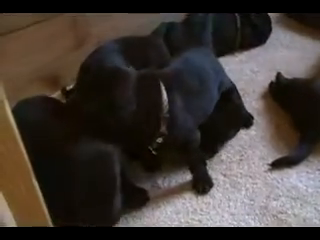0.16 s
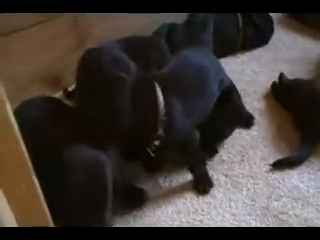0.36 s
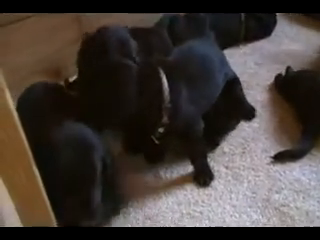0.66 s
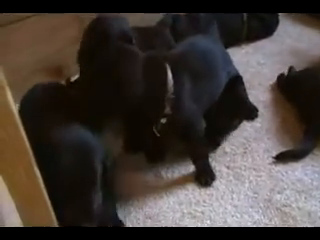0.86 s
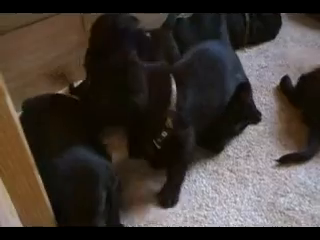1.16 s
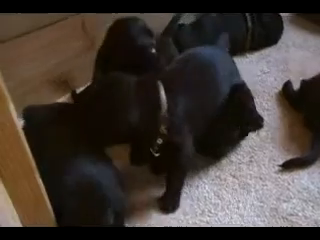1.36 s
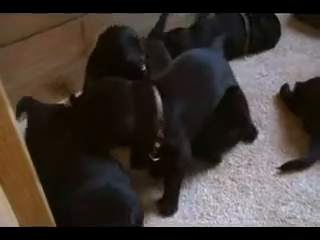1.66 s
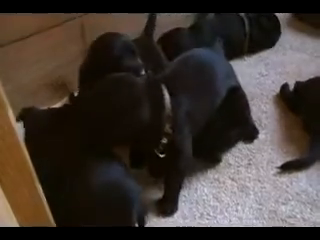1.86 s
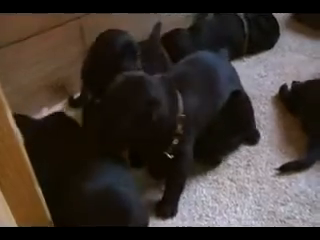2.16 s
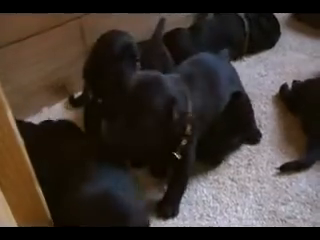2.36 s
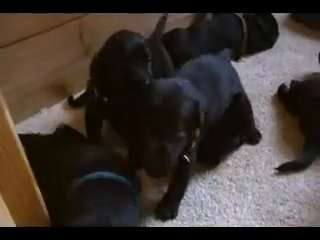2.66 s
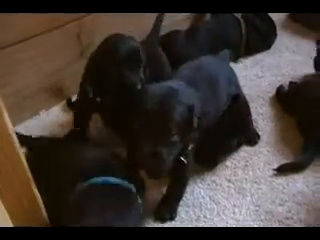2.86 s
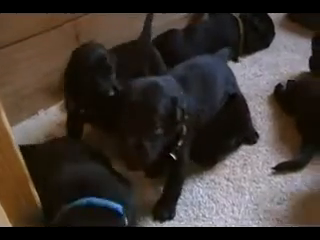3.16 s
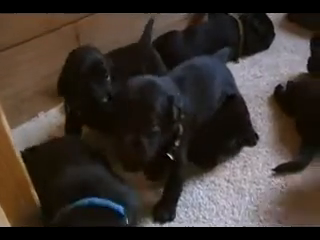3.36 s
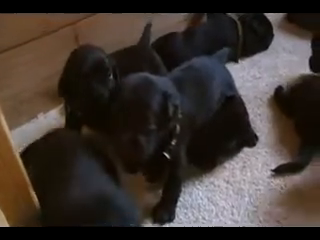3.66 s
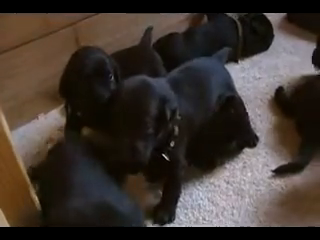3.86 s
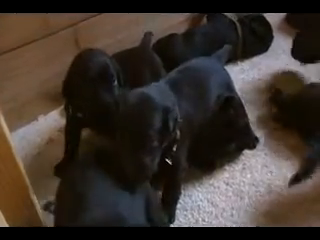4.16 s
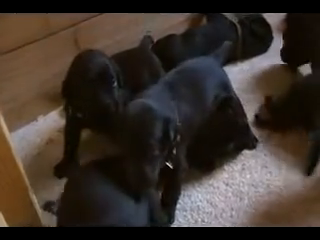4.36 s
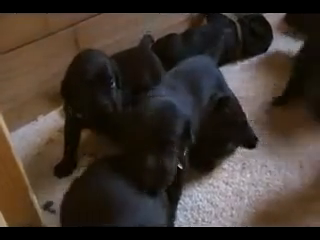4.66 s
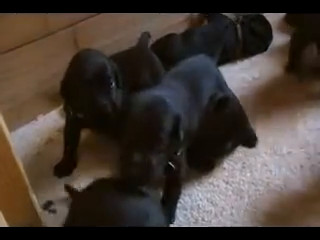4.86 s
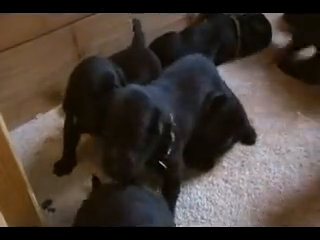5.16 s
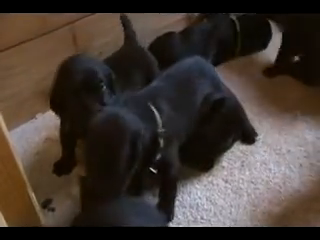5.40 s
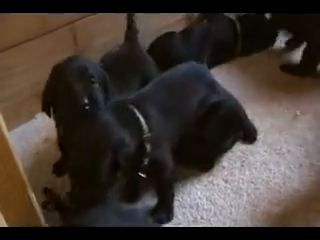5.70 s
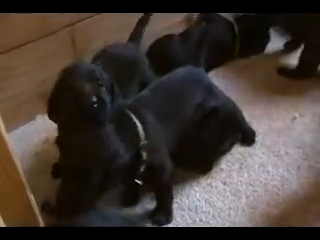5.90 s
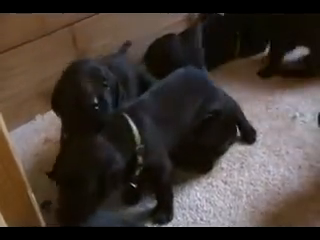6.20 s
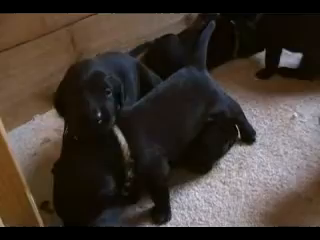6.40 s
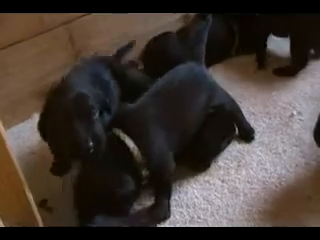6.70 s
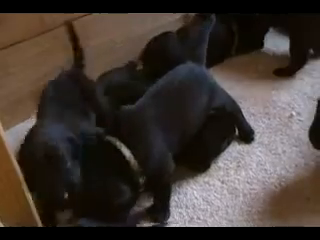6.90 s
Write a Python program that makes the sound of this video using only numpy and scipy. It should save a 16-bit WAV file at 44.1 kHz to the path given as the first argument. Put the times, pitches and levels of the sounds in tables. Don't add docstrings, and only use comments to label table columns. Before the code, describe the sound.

A young puppy cries close to the microphone in a small carpeted wooden pen, over steady faint hiss and a low house rumble. A soft floor thump and a tiny whine open the scene; at 0.5 s comes a bright, wavering open-mouthed yelp, and near 0.9 s a sharp shriek cracks into a hoarse low screech. From 1.25 to 3.5 s quick nasal whines, thin upward squeaks and raspy breaks follow in little clusters, with small gaps. An arching whine at 3.7 s leads to a squeak and groan around 4 s, a fuller thump near 4.4 s, a short howl at 4.6 s and a moan at 4.95 s. After a climbing cry at 5.3 s and a stutter at 5.55 s, the voice tires into brief low grunts until 7 s. Claws and collar tags tick lightly, paws thump hollow boards, and fur briefly scuffs carpet throughout.

```python
import sys
import numpy as np
from scipy import signal
from scipy.io import wavfile
from scipy.ndimage import uniform_filter1d

SR = 44100
rng = np.random.default_rng(int(sys.argv[2]) if len(sys.argv) > 2 else 0)


def dump_mix(stems):
    frames = np.atleast_2d(stems).T
    limited = np.clip(frames, -1, 1)
    pcm = np.round(limited * 32767).astype(np.int16)
    wavfile.write(sys.argv[1], SR, pcm)


def voltage_ratio(decibels):
    exponent = np.asarray(decibels, float) / 20
    return 10 ** exponent


N = 310464

# (frequency [Hz], density [dB per Hz])
HISS_SPECTRUM = [(35, -30), (60, 1.5), (354, -12), (732, -17), (1060, -21.5), (1440, -21), (9130, -28),
                 (13900, -38.5), (16000, -81)]
# (frequency [Hz], share [0-1])
HISS_LIKENESS = [(60, 0.73), (600, 0.56), (4000, 0.096), (12000, 0.75)]
# (time [s], level [dB])
RUMBLE_LEVEL = [(0, -39.5), (1.2, -38.5), (3.6, -39.5), (4.2, -43.5), (5.8, -42.5), (6.2, -49), (7.04, -45)]
# (time [s], peak [dB], frequency [Hz])
FLOOR_THUMPS = [(0.02, -28, 98.4), (0.804, -40, 110), (1.465, -32.5, 102), (2.19, -29, 100),
                (3.383, -36, 165), (3.447, -30, 129), (4.359, -21.5, 106), (4.525, -34.5, 99),
                (4.612, -35, 104), (5.133, -37, 95), (5.197, -33, 145), (5.455, -25.5, 101),
                (5.528, -31.5, 69.6), (6.404, -34, 94.2), (6.986, -26.5, 103)]
# (time [s], peak [dB], frequency [Hz])
CLAW_TICKS = [(0.324, -36.5, 9900), (0.417, -43.5, 3450), (0.4713, -45, 2620), (0.7281, -36, 1490),
              (2.826, -40, 9850), (3.337, -37, 1900), (3.8947, -41.5, 2520), (4.439, -44, 3270),
              (5.156, -31, 7500), (5.43, -42, 2180), (6.1858, -40.5, 1700), (6.4447, -33.5, 6250),
              (6.56, -41.5, 2330), (6.767, -33.5, 8100), (6.8527, -36.5, 1540)]
# (time [s], level [dB], length [s])
CARPET_SCUFFS = [(0.191, -36, 0.035), (1.162, -44, 0.088), (2.382, -45, 0.11), (3.573, -38.5, 0.015),
                 (5.138, -38.5, 0.055)]

# (frequency [Hz], width [Hz], level [dB])
NOSE_MODES = [(731.4, 324, 18.5), (964, 107, 12)]
MOUTH_MODES = [(1540, 520, 0)]
UPPER_MODES = [(4350, 1400, 8.5), (5100, 1440, 14)]
AIR_MODES = [(8620, 3300, -5), (14700, 1200, -18)]

# (start [s], length [s], effort [dB], first pitch [Hz], last pitch [Hz])
WHINES = [(0.25, 0.04, -23, 534, 708), (1.315, 0.043, -18.5, 672, 802), (1.693, 0.025, -21, 632, 718),
          (2, 0.034, -21.5, 570, 662), (2.267, 0.047, -14.5, 665, 805), (2.598, 0.037, -19, 569, 746),
          (3.207, 0.02, -16.5, 691, 808), (4.372, 0.012, -17.5, 736, 723), (5.777, 0.031, -25.5, 661, 682),
          (5.799, .03, -17, 722, 682)]
# (start [s], length [s], effort [dB], first pitch [Hz], last pitch [Hz])
SQUEAKS = [(1.541, 0.035, -29, 809, 1146), (1.897, 0.051, -28.5, 955, 1213), (2.533, 0.054, -33, 823, 1162),
           (2.841, 0.051, -38.5, 820, 1104), (3.985, .062, -24.5, 772, 1146), (4.297, .066, -47, 914, 1175),
           (5.243, 0.025, -23.5, 677, 942)]
# (start [s], length [s], effort [dB], pitch [Hz], chest tone re effort [dB])
GRUNTS = [(5.824, 0.021, -20, 245, -14), (6.055, 0.038, -25, 317, -13.5), (6.085, 0.017, -24, 248.6, -9.5),
          (6.297, .02, -24.5, 290.7, -10.5), (6.314, .044, -21, 262.8, -13.5),
          (6.573, .018, -28, 272.4, -7), (6.591, 0.026, -25.5, 230, -14), (6.863, 0.048, -26, 242.4, -13)]
# (start [s], length [s], effort [dB], pitch [Hz], chest tone re effort [dB])
OPEN_BURSTS = [(3.003, .018, -28, 334.4, -37), (3.281, .026, -29.5, 346.5, -5.5),
               (6.372, .02, -34, 261.6, 2), (6.648, 0.033, -34, 231, -0.5)]
# (start [s], length [s], effort [dB], mouth resonance re effort [dB])
RASPS = [(1.297, .019, -23, -3.5), (1.569, 0.031, -25, -1), (1.599, 0.035, -20.5, -3.5),
         (1.644, 0.06, -21.5, -2.5), (1.94, 0.069, -22, -1), (2.222, .05, -21, -4.5),
         (2.577, .024, -22.5, -7), (2.894, 0.016, -23.5, -9), (3.426, .016, -34, -13),
         (3.46, 0.037, -21.5, -11), (4.019, 0.025, -25, -6), (5.267, 0.035, -22, -8)]

# (time [s], effort [dB], pitch [Hz], jaw opening [dB])
YELP = [(0.505, -18, 1023, -20), (0.529, -28.5, 1233, -5.5), (0.535, -23, 1175, 10.5),
        (0.577, -13.5, 1288, -3), (0.591, -18.5, 1207, 0.5), (0.615, -16.5, 1247, -12.5),
        (0.637, -25, 1108, 7), (0.665, -26, 1137, 2.5), (0.679, -36.5, 1075, 10.5)]
SHRIEK = [(0.857, -21, 1050, -21), (0.865, -30, 1167, -8.5), (0.903, -13, 1408, -27.5),
          (0.913, -29.5, 1320, -3)]
SCREECH = [(0.919, -27, 326.6, 12), (0.93, -32, 298, 11), (0.945, -32, 322, 13), (0.97, -26.5, 294.2, 5.5),
           (1.005, -29, 320, 3.5), (1.024, -25.5, 331, -4), (1.04, -44, 362, -1)]
CHIRP = [(1.258, -50, 1087, -10), (1.269, -39, 1200, -12), (1.285, -25.5, 1257, -18),
         (1.299, -22, 1282, -13.5)]
# (time [s], effort [dB], pitch [Hz], mouth resonance re effort [dB])
HOWL = [(4.59, -33, 371, -20), (4.601, -21, 407.3, -5.5), (4.652, -16, 436, -10), (4.67, -26, 460.7, 8.5),
        (4.7, -19, 442, -6.5), (4.714, -18, 436, -8), (4.739, -37, 435, -6)]
# (time [s], effort [dB], pitch [Hz])
ARCH = [(3.7, -36, 662), (3.716, -19, 776), (3.741, -25.5, 901), (3.757, -14.5, 720), (3.766, -65, 710)]
GROAN = [(4.047, -13.5, 346.4), (4.065, -21.5, 323.5), (4.081, -19.5, 293.6), (4.101, -21, 309),
         (4.112, -23, 365)]
MOAN = [(4.944, -27, 363), (4.956, -17.5, 402), (4.97, -17, 346.7), (4.994, -17.5, 408.6),
        (5.011, -19.5, 465), (5.024, -44, 462)]
CLIMB = [(5.29, -24.5, 403), (5.304, -26.5, 481), (5.32, -32, 596), (5.33, -35, 672)]
STUTTER = [(5.535, -47, 793), (5.553, -16, 728), (5.566, -34, 771), (5.573, -19, 822), (5.582, -37, 909),
           (5.598, -14.5, 680), (5.607, -69, 650)]

SQUEAK_SHAPE = dict(attack_s=0.0038, release_s=0.005, first_db=-9, last_db=-7, swell_db=-3.5, bend=2.5)
WHINE_SHAPE = dict(attack_s=0.0096, release_s=0.0058, first_db=-1.5, last_db=-13.5, swell_db=0.5, bend=1.1)
TIRED_SHAPE = dict(attack_s=0.012, release_s=0.0061, first_db=-21, last_db=-14, swell_db=-2, bend=1)
GRUNT_SHAPE = dict(attack_s=0.01, release_s=0.0094, first_db=-18.5, last_db=-10, swell_db=-6, bend=1.1)
BURST_SHAPE = dict(attack_s=0.0057, release_s=0.014, first_db=-18, last_db=-19, swell_db=-4, bend=1.1)
RASP_SHAPE = dict(attack_s=0.0038, release_s=0.011, first_db=-8.5, last_db=-7.5, swell_db=6.5, bend=1.1)

# (mouth, upper) resonances re effort [dB]
SQUEAK_OPEN_DB, WHINE_OPEN_DB, TIRED_OPEN_DB = (-13, -25), (-11, -24), (-14, -36)
GRUNT_OPEN_DB, BURST_OPEN_DB = (-9.5, -30), (1.03, -23.5)
ARCH_OPEN_DB, GROAN_OPEN_DB, MOAN_OPEN_DB = (-15.5, -37), (-6.5, -22), (-13, -27)
CLIMB_OPEN_DB, STUTTER_OPEN_DB = (-9, -19), (-14.5, -30.5)

RASP_HZ = 218.7
TIRED_S = 5.5
TIRED_HALF_DB = -26.5


def evened(x, size=None):
    if size is None:
        power = np.mean(x ** 2)
    else:
        power = smooth(x ** 2, size)
    return x / np.sqrt(abs(power) + 1e-20)


def smooth(x, size):
    return uniform_filter1d(uniform_filter1d(x, size), size)


def resonate(x, hz, width_hz):
    turn = np.exp(2j * np.pi * np.cumsum(hz * np.ones(len(x))) / SR)
    r = np.exp(-np.pi * width_hz / SR)
    return 2 * (turn * signal.lfilter([1 - r], [1, -r], x / turn)).real


def add(mix, start_s, sound):
    part = mix[round(start_s * SR):][:len(sound)]
    part += sound[:len(part)]


def hiss():
    frames, hz = N // 256 + 5, np.fft.rfftfreq(1024, 1 / SR)
    a, b, c, d, patches = rng.standard_normal((frames, 513, 5)).T
    patches = uniform_filter1d(uniform_filter1d(patches, size=30, axis=0), size=10, axis=1)
    patches_db = 1.3 * evened(patches)

    def over_log_hz(table):
        table_hz, value = np.transpose(table)
        return np.interp(np.log(hz + 1), np.log(table_hz), value)[:, None]

    same = np.clip(over_log_hz(HISS_LIKENESS), 0, 1)
    left = a + 1j * b
    right = same * left + np.sqrt(1 - same ** 2) * (c + 1j * d)
    z = np.array([left, right]) * voltage_ratio(over_log_hz(HISS_SPECTRUM) + patches_db) * (hz > 45)[:, None]
    noise = signal.istft(z, nperseg=1024, noverlap=768)[1][:, :N]
    return voltage_ratio(-45.5) * evened(noise)


def rumble():
    shared, *ears = rng.standard_normal((3, N))
    hum = np.array([resonate(resonate(shared + 1.08 * ear, 28.0, 10.4), 31.1, 8.7) for ear in ears])
    level_db = np.interp(np.arange(N) / SR, *np.transpose(RUMBLE_LEVEL))
    return voltage_ratio(level_db + [[0.8], [-0.8]]) * evened(hum)


def litter():
    out, t = np.zeros(N), np.arange(SR // 8) / SR
    for s, db, hz in FLOOR_THUMPS:
        envelope = voltage_ratio(db + 3.5 - 60 * (t / 0.082) ** 1.8) * np.minimum(t / 0.0024, 1)
        add(out, s, envelope * np.sin(2 * np.pi * hz * t))
    for s, db, hz in CLAW_TICKS:
        burst = voltage_ratio(-60 * t / 0.02) * rng.standard_normal(len(t))
        ring = resonate(resonate(burst, hz, 0.5 * hz), hz, hz)
        add(out, s, voltage_ratio(db + 7) * ring / abs(ring).max())
    for s, db, length_s in CARPET_SCUFFS:
        grit_db = 3 * evened(uniform_filter1d(rng.standard_normal(len(t)), size=200))
        grains = rng.standard_normal(len(t)) * voltage_ratio(grit_db)
        drag = evened(resonate(resonate(grains, 360, 330), 410, 1400))
        add(out, s, voltage_ratio(db) * drag * np.exp(-((2 * t - length_s) / length_s) ** 4))
    return out


def board(near):
    bounce = resonate(resonate(near, 6400, 3600), 12000, 5300)
    wall = voltage_ratio(-1) * np.roll(bounce, 23)
    return np.array([wall, -wall])


def pen(x):
    size = SR // 4
    t = np.arange(size) / SR
    taps = rng.choice([-1., 1.], (2, size)) * (rng.random((2, size)) < 0.2) * np.minimum(t / 0.00097, 1)
    taps[1] = 1.11 * taps[0] + 0.52 * taps[1]
    boxy = np.array([resonate(resonate(ear, 700, 600), 700, 1100) for ear in taps])
    tail = 2.2 * boxy * voltage_ratio(-60 * t / 0.155) + taps * voltage_ratio(-60 * t / 0.12)
    return signal.fftconvolve(x[None], tail / np.linalg.norm(tail[0]), axes=1)[:, :N]


def note(start_s, length_s, effort_db, first_hz, last_hz, open_db,
         attack_s, release_s, first_db, last_db, swell_db, bend):
    t = np.linspace(0, length_s, num=12)
    rise, fall = min(attack_s, length_s / 2), min(release_s, length_s / 2)
    ends_db = np.interp(t, [0, rise, length_s - fall, length_s], [first_db, 0, 0, last_db])
    level_db = effort_db + swell_db * (t / length_s - 0.5) + ends_db
    hz = last_hz + (first_hz - last_hz) * np.clip(1 - t / length_s, 0, 1) ** bend
    return np.transpose([start_s + t, level_db, hz, open_db[0] + 0 * t, open_db[1] + 0 * t])


def tract(drive, modes, lift):
    out = 0
    for k, (hz, width_hz, db) in enumerate(modes):
        steep = resonate(drive, hz * lift, width_hz)
        steep = resonate(steep, hz * lift, width_hz)
        steep = resonate(steep, hz * lift, 2 * width_hz)
        out = out + (-1) ** k * voltage_ratio(db) * steep
    return evened(out, size=500)


def cry(rows, rough, wobble, chest_db=-40, lift=1, half_db=-60):
    s, *columns = np.transpose(rows)
    t = np.arange(s[0] - 0.002, s[-1] + 0.07, 1 / SR)
    effort_db, *pitch, mouth_db, upper_db = (np.interp(t, s, c) for c in columns)
    hz = pitch[0] if pitch else RASP_HZ * np.ones(len(t))
    noise = rng.standard_normal((4, len(t)))

    drift = evened(uniform_filter1d(noise[0], size=300))
    turns = np.cumsum(hz * (1 + wobble * drift)) / SR
    first = np.cos(2 * np.pi * turns)
    overtones = sum(np.cos(2 * np.pi * k * turns) * (k * hz < 15500) / np.sqrt(k) for k in range(2, 44))
    steady = evened(overtones)
    puffs = evened((0.3 + np.exp(-(turns % 1) / 0.39)) * noise[1])
    half = np.cos(np.pi * turns) * evened(smooth(noise[2], 100))

    strain = np.clip((np.median(upper_db) + 16.5) / 16, 0, 1)
    catch = 0.97 * np.exp(-(t - t[0]) / 0.0087)
    let_go = 0.21 * np.exp(np.minimum(t - s[-1], 0) / 0.0068)
    rough = np.clip(rough * (1 + strain / 2) + catch + let_go, 0, 0.9)
    ragged = np.minimum(2 * rough, 0.8)

    high = np.maximum(hz / NOSE_MODES[0][0], 1)
    shut = np.minimum(hz / 400, 1) ** (0.5 * (1 - strain)) if pitch else 1

    nose = tract((1 - rough) * evened(first + overtones) + rough * puffs, NOSE_MODES, high * shut)
    nose = nose + voltage_ratio(chest_db + 7.0) * first + voltage_ratio(half_db) * half
    mouth = tract((1 - ragged) * steady + ragged * puffs, MOUTH_MODES, high ** 0.68 * shut * lift)
    voiced = np.clip(0.34 + strain + 1.4 * (high - 1), 0, 1) * (1 - ragged) ** 2
    upper = tract(voiced * steady + (1 - voiced) * 0.5 * puffs, UPPER_MODES, 1 - 0.15 * strain / high)
    air = tract(puffs + 2.0 * voiced * steady, AIR_MODES, 0.98)

    flutter_db = 5.0 * np.minimum(rough, 0.35) * evened(smooth(noise[3], 200))
    edge = np.clip(np.minimum((t - t[0]) / 0.0041, (s[-1] + 0.011 - t) / 0.0027), 0, 1)
    parts = voltage_ratio(flutter_db) * nose + voltage_ratio(mouth_db) * mouth + voltage_ratio(upper_db) * upper + voltage_ratio(-27.5) * air
    gasp = np.exp(-((t - s[-1] - 0.025) / 0.023) ** 2) * evened(resonate(noise[2], 2600, 2800))
    return t[0], voltage_ratio(effort_db) * edge * parts + voltage_ratio(max(effort_db) - 33.0) * gasp


def jaw(rows, mouth_db=2):
    return [(s, db, hz, mouth_db + 0.92 * jaw_db, jaw_db) for s, db, hz, jaw_db in rows]


def held(rows, open_db):
    return [row + open_db for row in rows]


def puppy():
    out = np.zeros(N)
    clear = dict(rough=0.035, wobble=0.006)
    for row in WHINES:
        if row[0] > TIRED_S:
            rows = note(*row, TIRED_OPEN_DB, **TIRED_SHAPE)
            add(out, *cry(rows, 0.12, 0.0073, half_db=TIRED_HALF_DB))
        else:
            add(out, *cry(note(*row, WHINE_OPEN_DB, **WHINE_SHAPE), 0.035, 0.0073))
    add(out, *cry(jaw(YELP), **clear))
    add(out, *cry(jaw(SHRIEK), **clear))
    add(out, *cry(jaw(SCREECH), 0.2, 0.04, chest_db=-11))
    add(out, *cry(jaw(CHIRP, mouth_db=-4), **clear))
    for *row, mouth_db in RASPS:
        rows = note(*row, RASP_HZ, RASP_HZ, (mouth_db, -19), **RASP_SHAPE)
        no_pitch = np.delete(rows, 2, axis=1)
        add(out, *cry(no_pitch, 0.33, 0.2, chest_db=-22))
    for row in SQUEAKS:
        add(out, *cry(note(*row, SQUEAK_OPEN_DB, **SQUEAK_SHAPE), **clear))
    for *row, hz, chest_db in OPEN_BURSTS:
        lift = 1.287 if row[0] < TIRED_S else 1
        add(out, *cry(note(*row, hz, hz, BURST_OPEN_DB, **BURST_SHAPE), 0.22, 0.04, chest_db, lift))
    add(out, *cry(held(ARCH, ARCH_OPEN_DB), **clear))
    add(out, *cry(held(GROAN, GROAN_OPEN_DB), 0.2, 0.03, chest_db=-26))
    add(out, *cry(held(HOWL, (-28,)), 0.17, 0.012, chest_db=-8.0))
    add(out, *cry(held(MOAN, MOAN_OPEN_DB), 0.18, 0.025, chest_db=-9.5))
    add(out, *cry(held(CLIMB, CLIMB_OPEN_DB), 0.18, 0.025, chest_db=-2))
    add(out, *cry(held(STUTTER, STUTTER_OPEN_DB), 0.12, 0.006, half_db=TIRED_HALF_DB))
    for *row, hz, chest_db in GRUNTS:
        add(out, *cry(note(*row, hz, hz, GRUNT_OPEN_DB, **GRUNT_SHAPE), 0.16, 0.035, chest_db))
    return out


def scene():
    near = puppy() + litter()
    direct = near * voltage_ratio([[-0.6], [-0.45]]) + board(near)
    return direct + voltage_ratio(-18) * pen(near) + hiss() + rumble()


def lose_treble(x):
    hz, _, z = signal.stft(x, SR, nperseg=1024)
    cry_db = 10 * np.log10((abs(z[:, 10:]) ** 2).sum(axis=(0, 1)) + 1e-12)
    reach_hz = 130 * np.maximum(cry_db + 26.5, 0)
    z = z * (abs(hz[:, None] - 12000) >= reach_hz)
    return signal.istft(z, SR, nperseg=1024)[1][:, :N]


def roll_off(x):
    return signal.sosfilt(signal.butter(12, 16440, fs=SR, output="sos"), x)


def record(dry):
    mix = lose_treble(dry)
    return roll_off(mix)


dry = scene()
out = record(dry)
dump_mix(out)
```